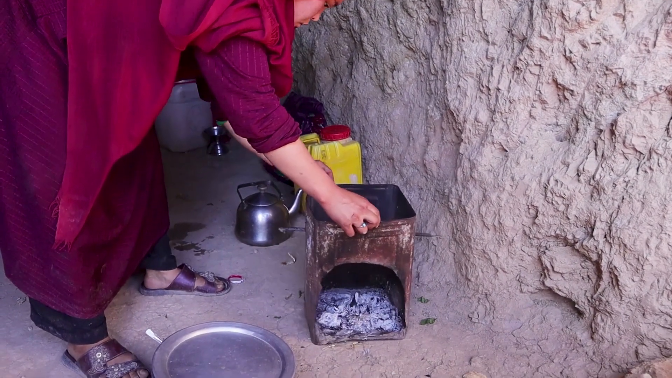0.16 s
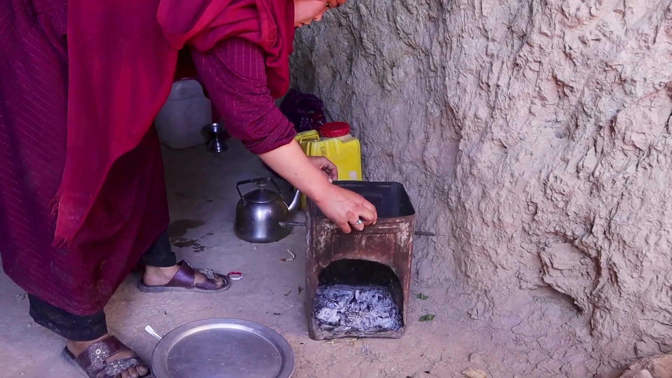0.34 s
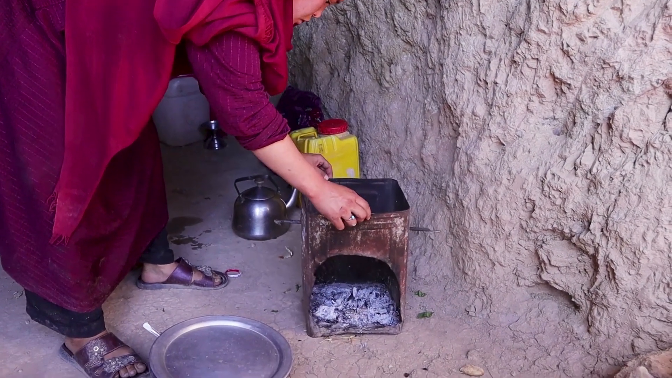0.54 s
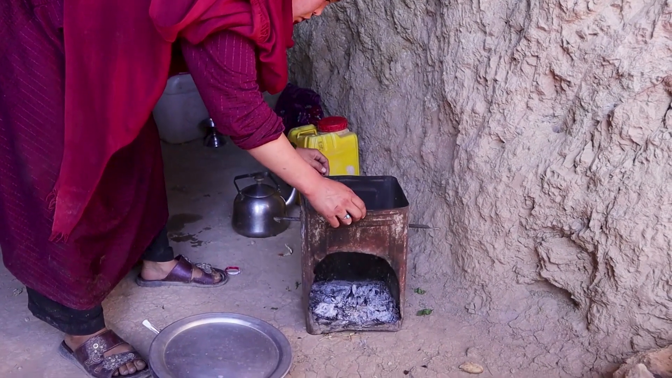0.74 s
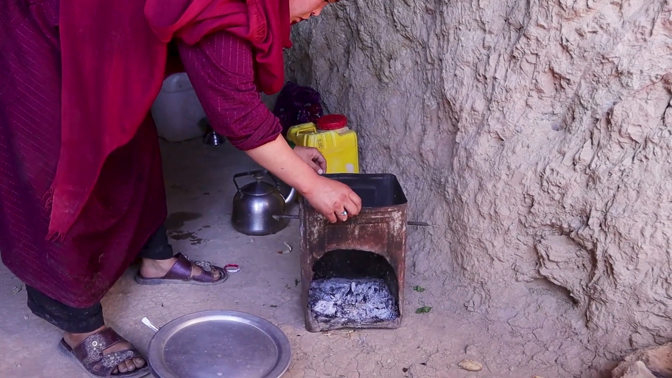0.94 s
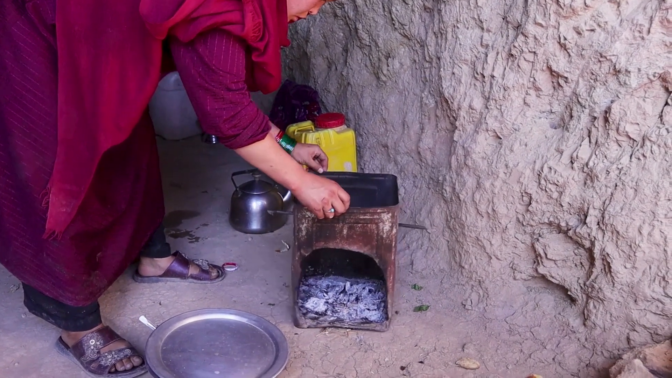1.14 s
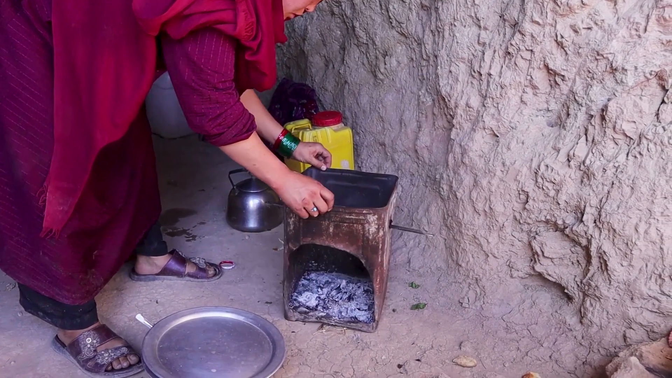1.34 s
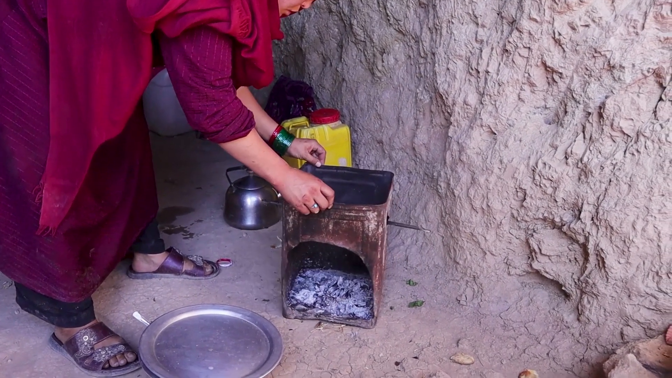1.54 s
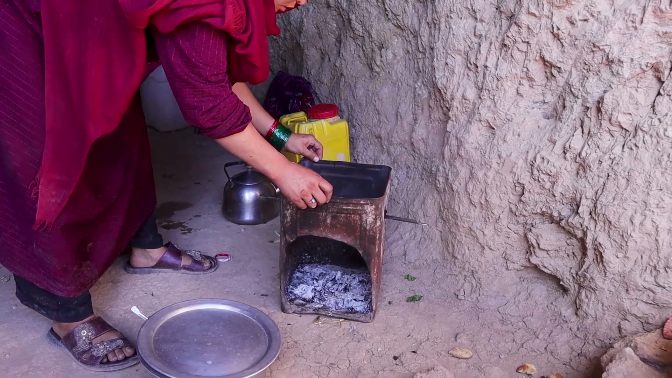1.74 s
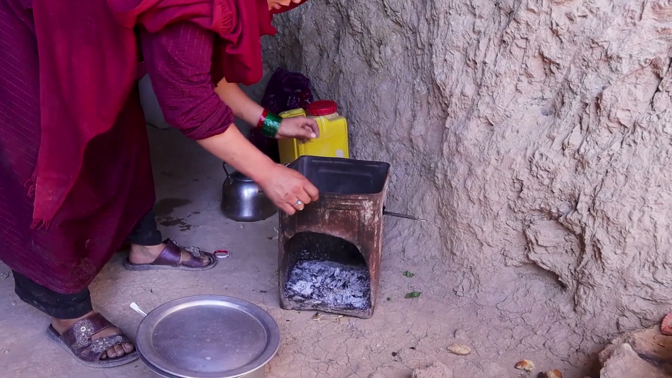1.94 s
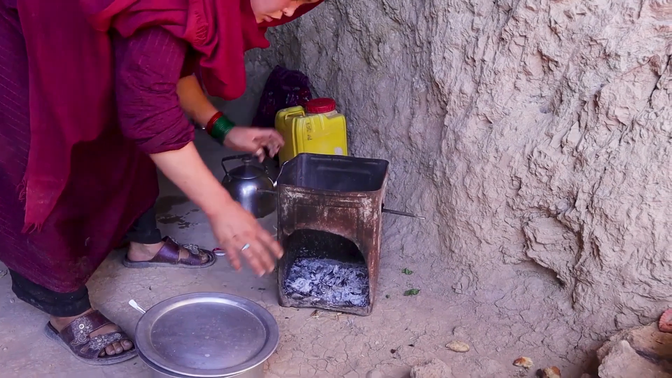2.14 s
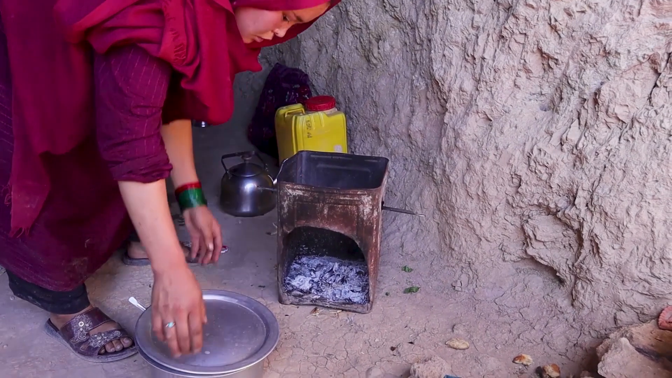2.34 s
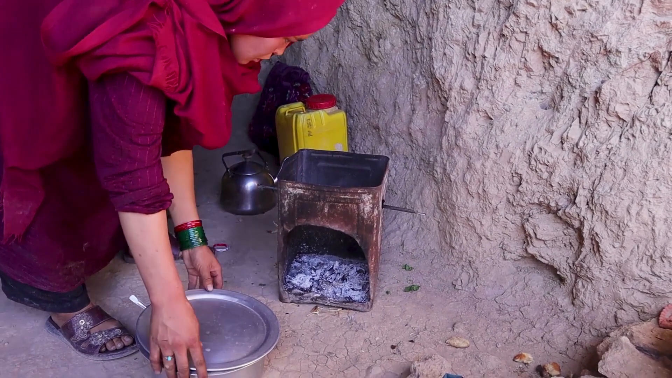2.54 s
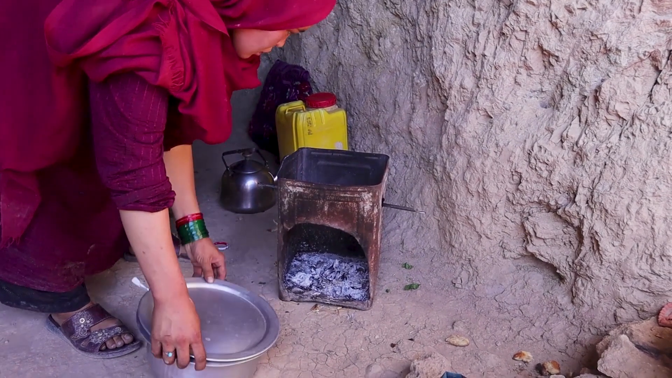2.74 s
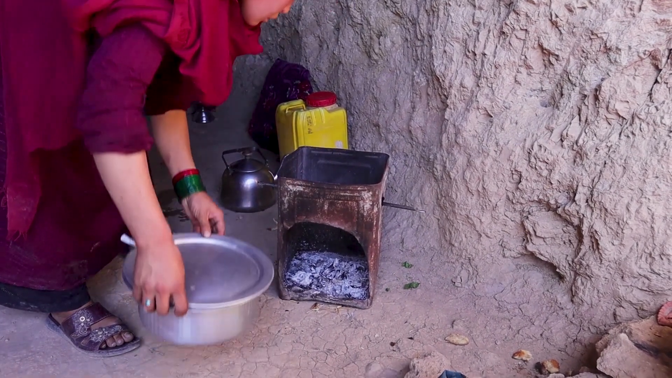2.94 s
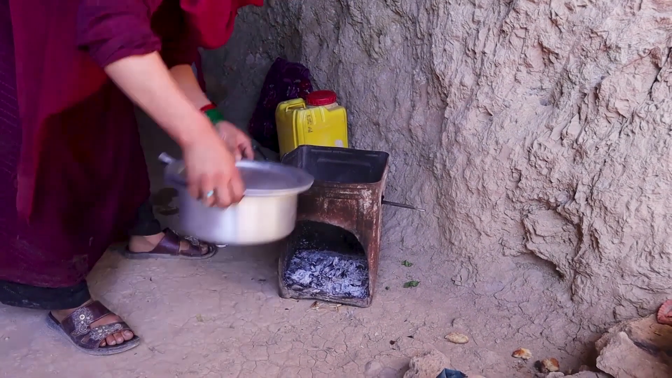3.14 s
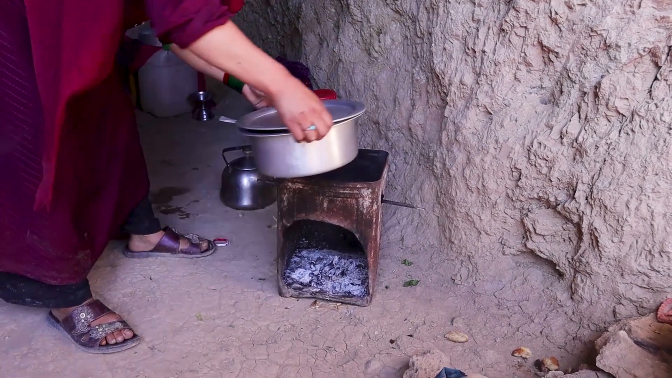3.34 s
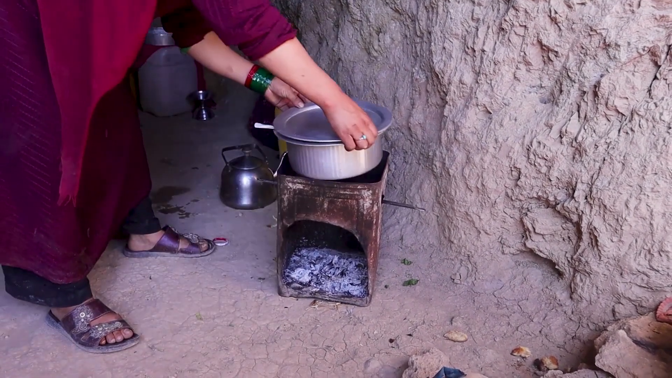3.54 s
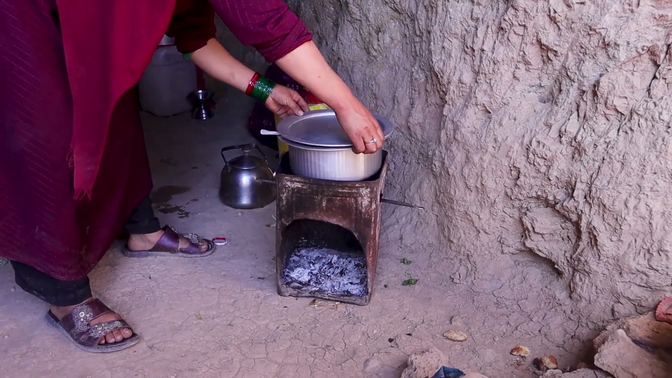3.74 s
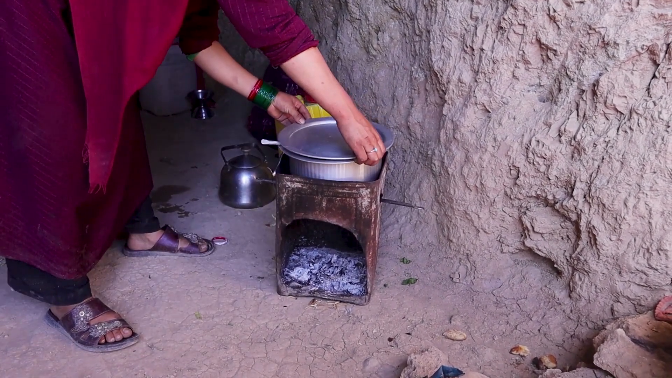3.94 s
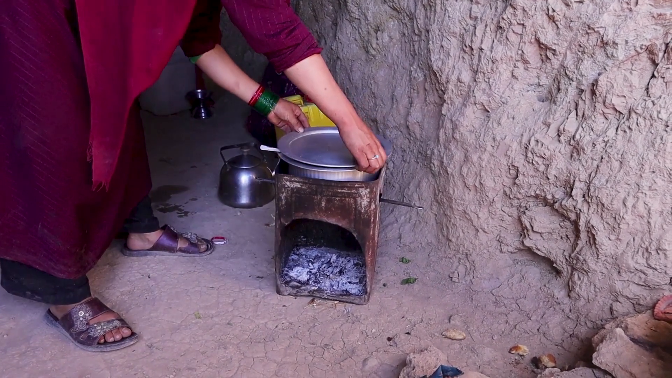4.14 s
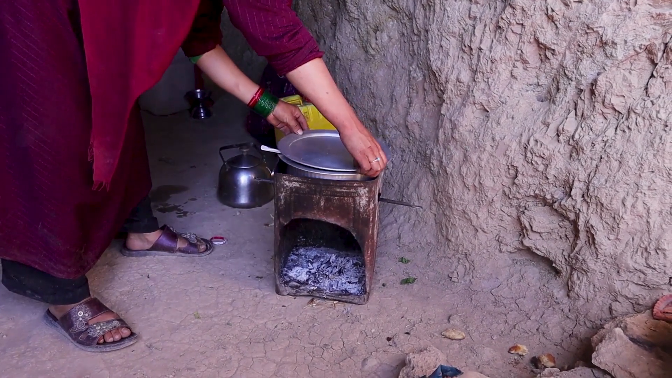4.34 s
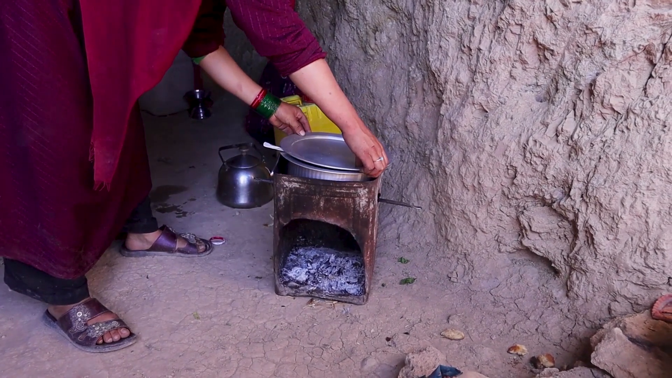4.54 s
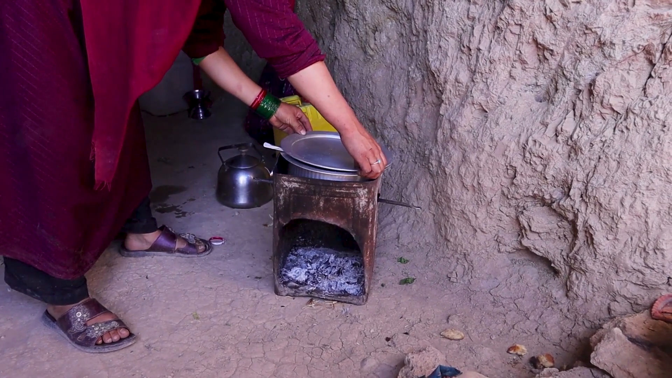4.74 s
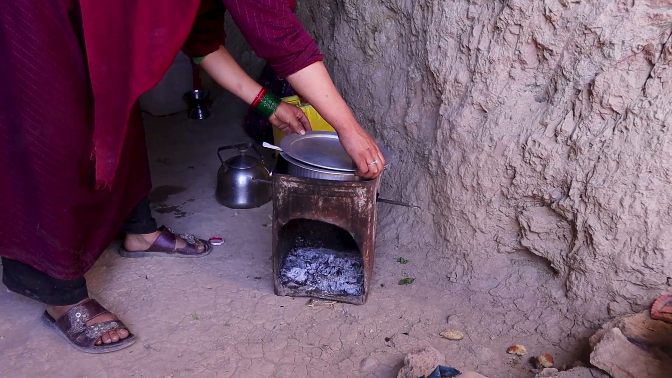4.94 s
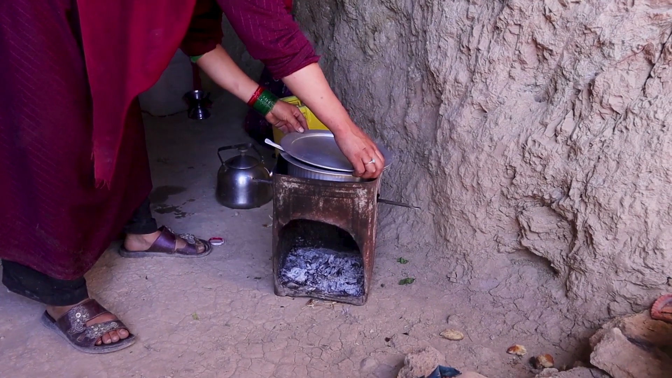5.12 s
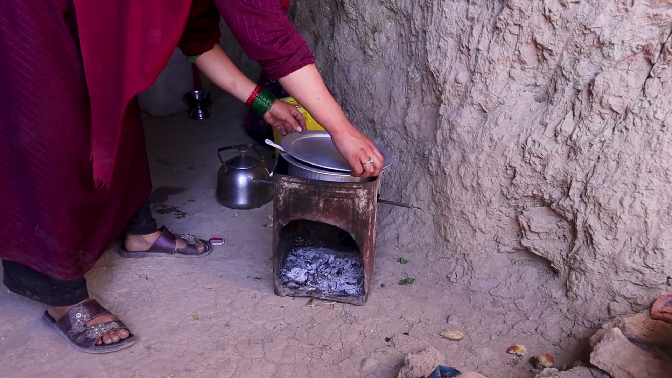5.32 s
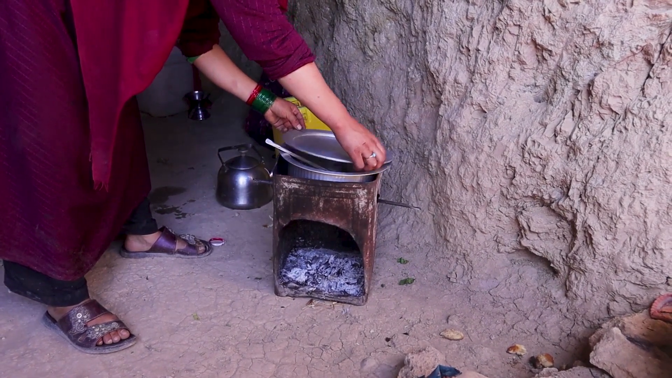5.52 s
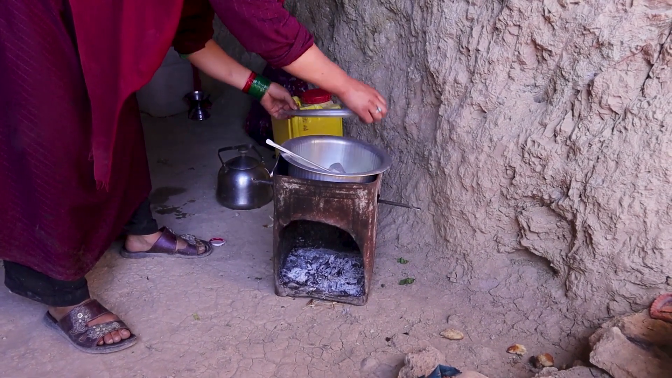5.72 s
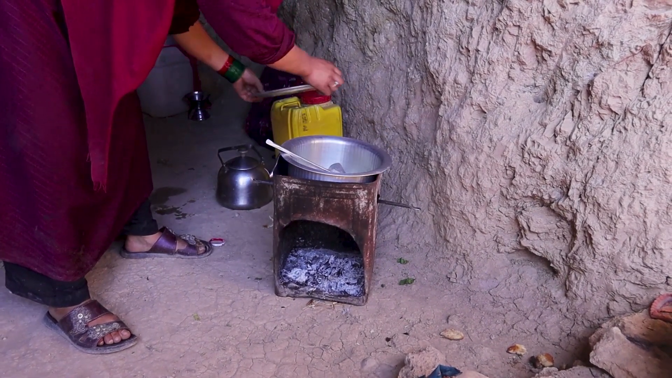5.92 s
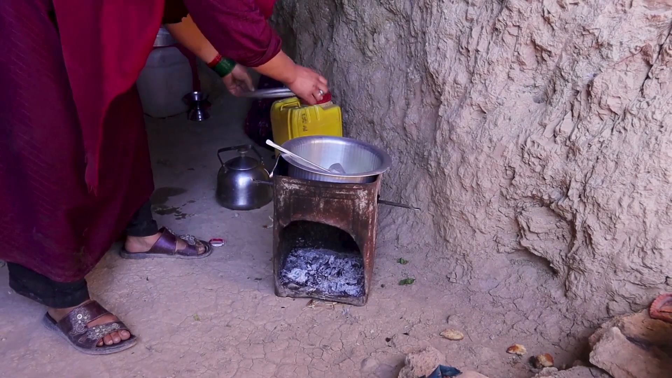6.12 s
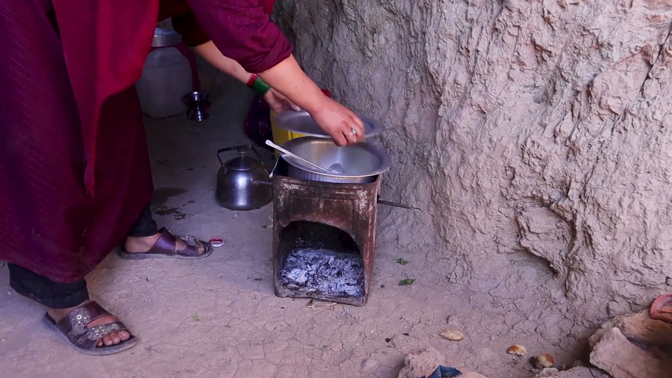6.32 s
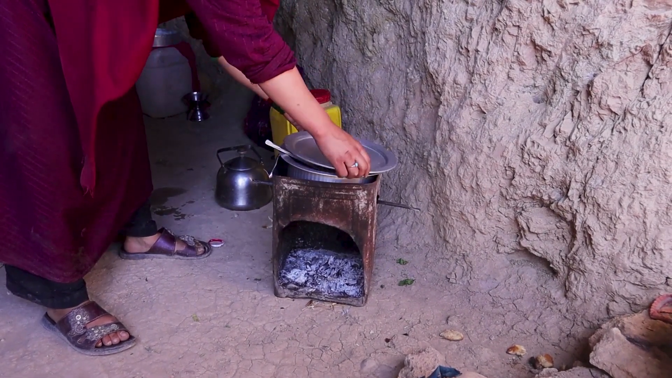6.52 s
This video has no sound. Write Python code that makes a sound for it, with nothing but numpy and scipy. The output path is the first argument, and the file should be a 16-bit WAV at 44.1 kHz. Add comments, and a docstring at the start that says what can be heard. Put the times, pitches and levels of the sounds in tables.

```python
"""An aluminium pot with a rattling lid clanks onto a sheet-iron stove in an earth-walled cooking nook.
First the stove is shuffled into place, its feet sticking, groaning and ticking over the gritty ground.
The pot is picked up, set on the stove and rocked until it sits; the lid is lifted off and put back.
Each knock rings a few strong modes of thin metal inside a noisy wash of weak ones.
Air bumps softly on the microphone over a faint hiss."""
import sys
import numpy as np
from scipy import signal
from scipy.fft import rfft, irfft, next_fast_len
from scipy.io import wavfile
from scipy.ndimage import uniform_filter1d

SR = 44100
rng = np.random.default_rng(int(sys.argv[2]) if len(sys.argv) > 2 else 0)


def pcm_store(signal):
    """Save signal as 16-bit PCM."""
    levels = np.round(np.clip(np.atleast_2d(signal), -1, 1) * 32767)
    wavfile.write(sys.argv[1], SR, levels.astype(np.int16).T)


N = 294235

# The iron's wash of weak, close-lying modes. Each row: frequency in Hz, relative level in dB.
IRON_WASH = [(70, -38), (115, 0), (165, -4), (220, -3.5), (330, 2.5), (480, -7.5), (640, -6), (850, -3.5),
             (1200, -6), (1600, -13), (2900, -17), (3700, -28.5), (5600, -35), (9000, -48.5), (15000, -62)]


def pot():
    """The pot lands in the mouth of the stove and slips down step by step."""
    # Each row: start in seconds, grind time in seconds, favoured pitch in Hz, level, extra thud and
    # brightness in relative dB, ring length factor (below 1 when pressed, above 1 when hanging free).
    knocks = [(3.598, 0.0024, 298, -30, -3, 8, 0.87), (3.627, 0.0082, 278, -31, -28, 4, 0.87),
              (3.683, 0.005, 304, -32, -26, 0.5, 1.62), (3.724, 0.0027, 280, -36, -28, -10.5, 1.73),
              (4.327, 0.013, 315, -27, -14.5, -2.5, 0.55), (4.352, 0.019, 315, -40, -2, 7.5, 0.97),
              (4.4, 0.0024, 258, -38.5, -19, -18, 1.3), (4.477, .0025, 260, -50.5, -3, 7, .9),
              (4.561, 0.0028, 360, -38, 5, 1, 1.3), (4.591, 0.008, 365, -29.5, -13, 5, 0.77),
              (4.642, 0.0024, 337, -35, -3.5, 2, 0.91), (4.767, 0.007, 308, -29, -18, 0, 0.91),
              (4.797, 0.0042, 337, -32.5, -15, -1.5, 0.69), (4.848, 0.023, 427, -37.5, -10.5, -1.5, 0.82)]
    # The pot's ring. Each row: frequency in Hz, relative level in dB, t60 in seconds before that factor.
    modes = [(112, -2.5, 0.49), (175.5, -5, 0.58), (285, 0, 0.81), (311.8, -2.5, 0.75), (362.4, 0.5, 0.66),
             (404.6, -7.5, 0.52), (436, -2, 0.66), (534, -17.5, 0.93), (768, -19.5, 0.78), (834, -18, 0.31),
             (857, -12.5, 0.52), (905, -12, 0.34), (977, -7, 0.69), (1047, -11, 0.35), (1176, -12, 0.64),
             (1286, -10.5, 0.31), (1635, -15, 0.4), (1795, -10.5, 0.33), (1908, -22, 1), (2090, -24, 0.33),
             (2190, -16, 0.19), (2660, -15, 0.32), (2746, -21, 0.26), (2800, -14.5, 0.3)]
    # Tone of a knock, thud to edge. Each row: register gain in dB, share of the brightness.
    voice = [(-1.5, 0), (1.5, 0.0098), (-8, 0.9), (-13, 0.94), (-32.5, 1.4)]
    return undb(-1) * play(knocks, IRON_WASH, ripple_db=2.5, voice=voice, accent="thud", edge=-0.1,
                           modes=modes, modes_db=-6, scatter_db=3.5, own_hz=833, favour_db=6.5,
                           early_db=-2, early_s=0.068, early_db_per_octave=0, crispness=0.17)


def lid():
    """The loose, plate-like lid clatters on the rim; on the stove the iron rings along with it."""
    # Each row: start in seconds, grind time in seconds, favoured pitch in Hz, then level, extra clang
    # and brightness in relative dB.
    knocks = [(2.652, 0.02, 870, -45.5, -7, -6), (2.704, 0.026, 988, -46, -3, -15),
              (2.764, 0.0021, 952, -36.5, 3.5, -3.5), (2.875, 0.0024, 975, -25.5, -1.5, 0),
              (2.915, 0.0021, 970, -37.5, 1.5, 9.5), (2.98, 0.0016, 920, -29, -2, .5),
              (3.01, .0022, 920, -39.5, 2, 3), (3.057, 0.0025, 813, -32.5, -0.5, -0.5),
              (3.077, 0.0021, 940, -47, -10, 11.5), (3.107, 0.0016, 906, -37, 1, 0.5),
              (3.146, 0.0017, 913, -45, 2.5, 4.5), (3.189, 0.002, 990, -48.5, 4, -2),
              (5.618, .0016, 1010, -43, 2.5, -6.5), (5.655, 0.0029, 1004, -55, -5, -5),
              (5.742, 0.0018, 891, -66, -3, 8), (6.6268, 0.0028, 868, -38.5, 0, 6.5)]
    # The ring of the loose lid, and of lid and pot seated in the stove.
    # Each row: frequency in Hz, relative level in dB, t60 in seconds before damping.
    loose_modes = [(253, -6.5, 0.82), (274.3, 1, 0.34), (302, -5.5, 0.48), (331, 3.5, 0.4),
                   (358, -5.5, 0.34), (373, -7, 0.21), (450, -13, 0.72), (483, -7, 0.34), (816, -7, 0.48),
                   (930.4, 2, 0.28), (977, -1.5, 0.5), (998, -8.5, 0.33), (1427, -8, 0.21),
                   (1572, -10, 0.54), (1920, -9, 0.27), (2100, -10, 0.28), (2427, -13, 0.32),
                   (2490, -11.5, 0.48), (2780, -10.5, 0.23), (2810, -9.5, 0.23), (3040, -13, 0.21),
                   (3030, -14, 0.37), (3300, -32, .5), (3434, -24, 0.52), (3450, -22, 0.55),
                   (4830, -26, 0.27), (5350, -30, 0.19), (5680, -26, 0.13), (6930, -40, 0.2),
                   (8500, -34, 0.1)]
    seated_modes = [(283, -9.5, 0.46), (352, -1.5, 0.56), (384, -4.5, 0.3), (440, -8, 0.38), (567, -4.5, 1),
                    (678, -6, 0.26), (830, 5, 0.11), (893, 1, 0.73), (984, -1, 0.37), (1004, -2, 0.33),
                    (1264, -5, .45), (1563, -12, 0.46), (2010, -8, .45), (2196, -2.5, 0.38),
                    (2530, -0.5, 0.37), (2700, 1, .45), (3100, -15, 0.39), (3300, -14, .3),
                    (4220, -11, 0.49), (4460, -21, .35), (5400, -17, 0.31), (5660, -21, .3)]
    # Their washes of weak modes. Each row: frequency in Hz, relative level in dB.
    loose_wash = [(70, -37), (200, -20.5), (290, -10.5), (420, -2), (700, -2.5), (960, -1), (1180, -6.5),
                  (1750, -8.5), (2700, -3.5), (4000, -17.5), (6000, -26), (10500, -31), (12000, -40.5),
                  (15000, -44)]
    seated_wash = [(70, -22), (230, 5), (400, -2), (600, -3), (880, -15), (1250, -4), (1750, -4),
                   (2450, -3), (3700, -13.5), (5500, -11), (7000, -25.5), (10000, -29), (15000, -50)]
    # Tone of a knock, thud to edge. Each row: register gain in dB, share of the brightness.
    loose_voice = [(-16.5, 0.88), (1, 0.041), (-2.5, 0.37), (-6.5, 1.09), (-17.5, 1.22)]
    seated_voice = [(-18, 0), (-1, 0.17), (3, 0.091), (-2, 0), (-12.5, 1)]
    seated_from_s = 4
    loose_ring, seated_ring = 0.65, 0.78  # the hand shortens the ring
    loose = [(*row, loose_ring) for row in knocks if row[0] < seated_from_s]
    seated = [(*row, seated_ring) for row in knocks if row[0] >= seated_from_s]
    rattle = play(loose, loose_wash, ripple_db=1, voice=loose_voice, accent="clang", edge=0.35,
                  modes=loose_modes, modes_db=2.5, scatter_db=1.5, own_hz=264.6, favour_db=5.5,
                  early_db=1, early_s=0.051, early_db_per_octave=3.5, crispness=0.47)
    clank = play(seated, seated_wash, ripple_db=4, voice=seated_voice, accent="clang", edge=0,
                 modes=seated_modes, modes_db=-6, scatter_db=2.5, own_hz=405, favour_db=9,
                 early_db=1.5, early_s=0.058, early_db_per_octave=6, crispness=0.2)
    return rattle + clank


def stove():
    """The iron box judders over the earth in short shoves."""
    # Each row: start in seconds, grind time in seconds, favoured pitch in Hz, then level, extra thud
    # and brightness in relative dB.
    shoves = [(.012, 0.0042, 450, -51.5, 1.5, -5), (.137, 0.0081, 355, -45.5, -8, 1),
              (.153, 0.0087, 330, -35.5, -4, 1.5), (.195, 0.0028, 480, -44, -20, -1),
              (0.316, 0.011, 292, -55, 4.5, 4), (.403, 0.011, 425, -38.5, -7.5, -6),
              (.44, 0.018, 420, -43.5, -6, -9), (.508, 0.007, 433, -55, 9, 6),
              (.546, 0.0091, 398, -40, -27, -1.5), (1.0, 0.044, 289, -53.5, -10, 5.5),
              (1.065, .006, 283, -57.5, -7, 10), (1.301, 0.0044, 273, -34, 2.5, -1.5),
              (1.322, 0.011, 313, -37.5, -6, 3), (1.349, 0.0092, 373, -36, -28, 5),
              (1.383, 0.0038, 367, -37, -4, 0), (1.517, .016, 314, -38.5, -5.5, 3),
              (1.553, 0.0028, 260, -40, -13, -11), (1.655, 0.0033, 363, -46, 5, -3.5),
              (1.768, 0.0056, 398, -41.5, -24, 3.5), (1.826, 0.019, 401, -37.5, -35, 3.5)]
    # The box's ring. Each row: frequency in Hz, relative level in dB, t60 in seconds before damping.
    modes = [(112.7, -4.5, 0.56), (171.4, -3, 0.22), (192.6, -9.5, 0.094), (261.7, -8, 0.37),
             (283.2, -14.5, 0.2), (294, -7.5, 0.85), (342.2, -5, 0.17), (375, -2, 0.15),
             (396.3, -6.5, 0.58), (437.4, -4.5, 0.62), (521.7, -10.5, 0.22), (560.7, -9, 0.3),
             (741, -12, 0.33), (840, -16, 0.32), (850, -10, 0.87), (1030, -13.5, 1), (1007, -11.5, 0.2),
             (1192, -17, 0.63), (1514, -26.5, 0.81), (1840, -27, 0.27), (2210, -18, 0.32),
             (2300, -23.5, 0.13), (2500, -19, 0.3), (2650, -28, .35), (2770, -22.5, 0.43), (3000, -24, .3)]
    # Tone of a shove, thud to edge. Each row: register gain in dB, share of the brightness.
    voice = [(0.5, 0.16), (1, 0), (-4.5, 0.38), (-8.5, 1), (-26.5, 0.91)]
    damped = [(*row, 0.86) for row in shoves]  # the ground shortens the ring
    return play(damped, IRON_WASH, ripple_db=4.5, voice=voice, accent="thud", edge=-0.2,
                modes=modes, modes_db=1.5, scatter_db=3.5, own_hz=904, favour_db=6.5,
                early_db=-0.5, early_s=0.17, early_db_per_octave=3.5, crispness=0.3)


def groans(waver=0.0208, rough_db=3.5, attack_s=0.0038, t60=0.13):
    """A stove foot sticks and slips at a near-steady rate and makes the sheet iron sing."""
    # Each row: start and length in seconds, slip rate, driven resonance and its width in Hz, level in dB.
    slips = [(.132, 0.046, 1383, 2830, 500, -50.5), (.408, 0.083, 436, 450, 160, -38),
             (.998, 0.062, 501, 2360, 1000, -56), (1.11, 0.28, 521, 528, 100, -56),
             (1.369, 0.15, 401.4, 400, 119, -44.5)]
    out = np.zeros(N)
    t = np.arange(SR // 2) / SR
    for start_s, length_s, slip_hz, centre_hz, width_hz, db in slips:
        phase = 2 * np.pi * np.cumsum(slip_hz * (1 + waver * walk(len(t), 91))) / SR
        tone = np.zeros(len(t))
        for k in range(1, 9):
            harmonic = np.sin(k * phase + rng.uniform(0, 2 * np.pi))
            roughness = undb(rough_db * walk(len(t), 123))
            resonance = 1 / np.hypot(1, 2 * (k * slip_hz - centre_hz) / width_hz)
            rolloff = 1 / np.hypot(1, (k * slip_hz / 3300) ** 4)
            tone += harmonic * roughness * resonance * rolloff
        attack = np.minimum(t / attack_s, 1)
        release = np.exp(-np.log(1000) * np.maximum(t - length_s, 0) / t60)
        start = int(start_s * SR)
        out[start:start + len(t)] += undb(db) * attack * release * tone / rms(tone)
    return out


def ticks():
    """Hard points of grit and loose metal snap past each other: a bright spit with a short tail."""
    # Each row: start in seconds, pitch in Hz, width in octaves, t60 in seconds, level in dB.
    snaps = [(.134, 10000, 0.63, 0.089, -57), (.322, 8500, .6, .12, -69), (1.351, 8000, 0.55, .15, -68),
             (1.94, 9400, 0.15, 0.052, -62), (3.891, 7360, 0.58, 0.061, -68),
             (4.846, 9050, .3, 0.23, -66.5), (5.742, 4180, .25, 0.19, -72)]
    out = np.zeros(N)
    size = SR // 4
    t, f = np.arange(size) / SR, freqs(size) + 1
    for start_s, hz, octaves, t60, db in snaps:
        band = np.exp(-(np.log2(f / hz) / octaves) ** 2)
        spit = irfft(rfft(rng.standard_normal(size)) * band, size)
        start = int(start_s * SR)
        out[start:start + size] += undb(db) * spit / rms(spit) * swell(t, 0.001, t60)
    return out


def play(rows, wash, ripple_db, **metal):
    """All the contacts of one metal object; its weak modes bunch at the same pitches every time."""
    f = np.geomspace(60, 16000, 700)
    bunching = ripple_db * rng.standard_normal(len(f)) * np.minimum(f / 1500, 1)
    shell = np.c_[f, over_hz(wash, f) + bunching]
    out = np.zeros(N + 2 * SR)
    for row in rows:
        sound = contact(row, shell, **metal)
        start = int(row[0] * SR)
        out[start:start + len(sound)] += sound
    return out[:N]


def contact(row, shell, voice, accent, edge, modes, modes_db, scatter_db, own_hz, favour_db,
            early_db, early_s, early_db_per_octave, crispness):
    """One blow or scrape on thin metal: a few strong modes in the shell's wash of weak ones."""
    # The five registers: thud, body, clang, ring, edge. Each row: low and high limit in Hz.
    registers = [(70, 210), (210, 600), (600, 1500), (1500, 3500), (3500, 15000)]
    # The tone of a soft contact. Each row: frequency in Hz, gain in dB.
    soft_tone = [(3600, 1.5), (5400, 3), (7000, -2.5), (14000, -10)]
    # How long the wash lasts. Each row: frequency in Hz, t60 in seconds before the ring factor.
    wash_t60 = [(100, 0.41), (300, 0.68), (1000, 0.59), (2800, 0.36), (5000, 0.42), (12000, 0.18)]
    _, grind_s, favoured_hz, blow_db, accent_db, bright_db, ring_factor = row
    # A sharp edge lifts the upper registers; landing flat adds thud if heavy, clang if light.
    levels = [blow_db + db + share * bright_db for db, share in voice]
    levels[("thud", "body", "clang").index(accent)] += accent_db
    # Past a firm blow a clean rim gains extra edge (edge > 0); gritty iron's hiss grows less (edge < 0).
    firm_db = -29.5
    levels[-1] += edge * (blow_db + bright_db - firm_db)
    size = next_fast_len(int(0.7 * SR))
    t, f = np.arange(size) / SR, freqs(size)
    # The place of contact decides which modes speak; the grip detunes them a little.
    favour = favour_db * favouring(f, (favoured_hz, own_hz))
    hz, db, t60 = np.transpose(modes)
    db = db + modes_db + np.interp(hz, f, favour) + scatter_db * rng.standard_normal(len(hz))
    hz = hz * (1 + 0.0018 * rng.standard_normal(len(hz)))
    t60 = ring_factor * t60
    phase = rng.uniform(0, 2 * np.pi, len(hz))
    # A longer, softer contact leaves the highest modes asleep.
    softness = np.clip(np.log2(grind_s / 0.0033), 0, 1)
    wash_db = over_hz(shell, f) + favour + softness * over_hz(soft_tone, f)
    wash = rfft(rng.standard_normal(size)) * undb(wash_db)
    wash /= rms(irfft(wash, size))
    # The edges chatter as they slide.
    chatter = undb(0.6 * walk(size, 302) * np.exp(-t / (grind_s + 0.021)))
    attack = slice(0, int((grind_s + 0.03) * SR))
    out = np.zeros(size)
    for (low, high), level_db in zip(registers, levels):
        centre = np.sqrt(low * high)
        part = irfft(wash * ((f >= low) & (f < high)), size) * chatter
        part *= swell(t, grind_s, ring_factor * over_hz(wash_t60, centre))
        for k in np.flatnonzero((hz >= low) & (hz < high)):
            alive = t[:int((grind_s + t60[k]) * SR)]
            mode = np.sin(2 * np.pi * hz[k] * alive + phase[k])
            part[:len(alive)] += undb(db[k]) * mode * swell(alive, grind_s, t60[k])
        # The direct sound stands out at first, most briefly in the treble; the walls carry the rest.
        direct_s = early_s * (1000 / centre) ** crispness
        direct = np.exp(-np.maximum(t - grind_s, 0) / direct_s)
        part *= 1 + undb(early_db + early_db_per_octave * np.log2(centre / 1000)) * direct
        # A hard contact opens with a crack of a few milliseconds in the top.
        part *= 1 + 0.66 * (1 - softness) * centre / 7000 * np.exp(-t / 0.0011)
        out += part * undb(level_db) / rms(part[attack])
    return out


def favouring(f, pitches):
    """A point of contact picks out a few resonances and, less so, the neighbours of the lowest."""
    peaks = sum(np.exp(-((f - pitch) / (12 + pitch / 50)) ** 2) for pitch in pitches)
    neighbours = np.exp(-(np.log((f + 1) / min(pitches)) / 0.11) ** 2)
    return peaks + 0.6 * neighbours


def swell(t, grind_s, t60):
    """Vibration builds while the contact lasts, then dies away freely."""
    build = np.sqrt((t / grind_s).clip(0, 1))
    return build * np.exp(-np.log(1000) * (t - grind_s).clip(0) / t60)


def buffet(flutter_db=3.5, flutter_hz=14):
    """A fluttering draught and a few slow puffs of air rumble on the microphone."""
    # The rumble's tone. Each row: frequency in Hz, relative level in dB.
    rumble_tone = [(12, 1.5), (30, -5.5), (55, 5), (80, -3), (130, -14.5), (250, -59), (600, -73)]
    # The light draught. Each row: time in seconds, level in dB.
    draught_levels = [(0, -55), (.7, -57.5), (2.0, -51.5), (3.1, -55.5), (3.6, -61), (4.3, -59),
                      (4.95, -46.5), (5.7, -54.5), (6.67, -63.5)]
    # Stronger puffs swell and fade. Each row: peak time and half length in seconds, level in dB.
    puff_peaks = [(2.273, 0.084, -43.5), (2.471, 0.063, -41), (2.597, 0.022, -35), (5.129, 0.017, -34),
                  (5.372, .05, -36), (5.493, 0.039, -40.5)]
    t = np.arange(N) / SR
    rumble = colour(rng.standard_normal(N), rumble_tone)
    running_rms = np.sqrt(uniform_filter1d(rumble ** 2, SR // 10) + 1e-12)
    draught = undb(over_time(draught_levels) + flutter_db * walk(N, flutter_hz))
    puffs = sum(undb(db) * np.exp(-((t - peak_s) / half_s) ** 2) for peak_s, half_s, db in puff_peaks)
    return rumble / running_rms * np.hypot(draught, puffs)


def hush(base_db=-55):
    """Faint room air, a little unsteady below and smooth in the treble."""
    # The still air of the nook. Each row: frequency in Hz, relative level in dB.
    air_tone = [(53, -29), (90, -4.5), (124, -7), (158, -13), (237, -5), (276, -14), (389, -15.5),
                (527, -19), (793, -21.5), (1000, -19), (1140, -23), (1650, -30), (2710, -33), (3660, -36.5),
                (15500, -47.5)]
    # Its faint resonances. Each row: frequency in Hz, width in Hz, boost in dB.
    resonances = [(280, 27, 3.5), (1036, 56, 3), (2800, 180, 4.5)]
    # The hush sinks twice. Each row: time in seconds, dB above the base level.
    fader = [(0, 5.5), (.7, 4.5), (3.2, 3.5), (3.45, -1), (3.75, -5.5), (3.95, -1), (4.2, 3), (4.4, 3.5),
             (6.35, 3), (6.6, -3), (6.67, -6)]
    f = np.geomspace(20, 20000, 300)
    peaks_db = sum(db * np.exp(-((f - hz) / width) ** 2) for hz, width, db in resonances)
    air = colour(rng.standard_normal(N), np.c_[f, over_hz(air_tone, f) + peaks_db])
    lows = signal.sosfilt(signal.butter(1, 900, fs=SR, output="sos"), air)
    air += lows * (undb(1.4 * walk(N, 14)) - 1)
    return air / rms(air) * undb(base_db + over_time(fader))


def undb(db):
    """Decibels to gain."""
    return 10 ** (np.asarray(db) / 20)


def rms(x):
    """Root mean square."""
    return np.sqrt(np.mean(x ** 2) + 1e-20)


def over_hz(points, f):
    """Read (Hz, value) points on a logarithmic frequency axis."""
    hz, value = np.transpose(points)
    return np.interp(np.log(f + 1e-3), np.log(hz), value)


def over_time(points):
    """Read (seconds, value) points at every sample."""
    return np.interp(np.arange(N) / SR, *np.transpose(points))


def freqs(size):
    """Frequencies of the bins of a spectrum."""
    return np.fft.rfftfreq(size, 1 / SR)


def colour(x, points):
    """Filter by a (Hz, dB) curve."""
    size = next_fast_len(len(x))
    return irfft(rfft(x, size) * undb(over_hz(points, freqs(size))), size)[:len(x)]


def walk(size, rate_hz):
    """Smooth random wandering with a spread near 1."""
    steps = np.arange(size) / SR * rate_hz
    return np.sqrt(3 / 2) * np.interp(steps, np.arange(2048), rng.standard_normal(2048))


def scene():
    """Everything sits in the middle; only the hiss has some width."""
    # Stereo width of the hiss. Each row: frequency in Hz, side minus mid in dB.
    hiss_width = [(100, -23), (1000, -21.5), (2500, -19), (4500, -14.5), (8000, -6.5), (13000, -9)]
    mid = stove() + groans() + ticks() + lid() + pot() + buffet() + hush()
    side = colour(hush(), hiss_width)
    return np.array([mid + side, mid - side])


def record(dry):
    """A steep low-pass cuts the top above 15.75 kHz."""
    return signal.sosfilt(signal.ellip(10, 0.2, 80, 15750, fs=SR, output="sos"), dry)


dry = scene()
out = record(dry)
pcm_store(out)
```